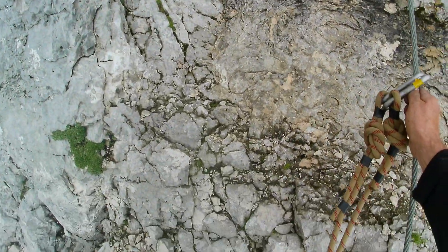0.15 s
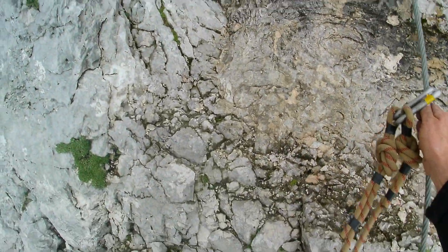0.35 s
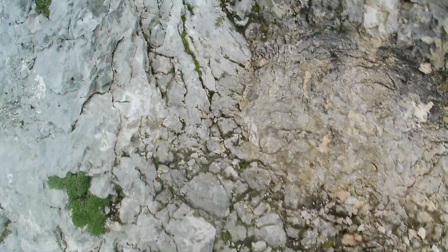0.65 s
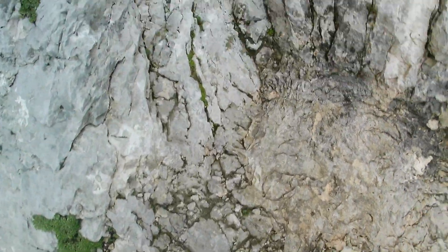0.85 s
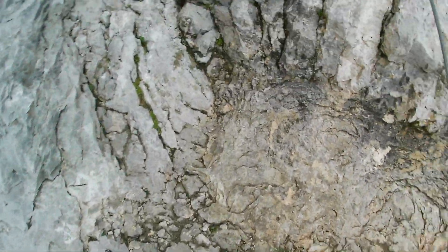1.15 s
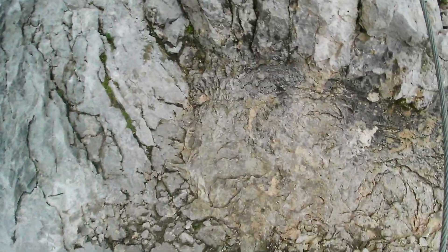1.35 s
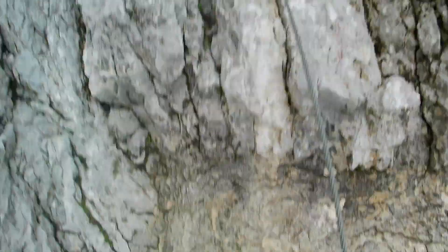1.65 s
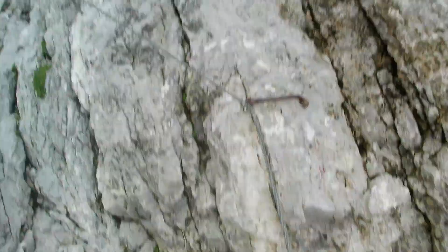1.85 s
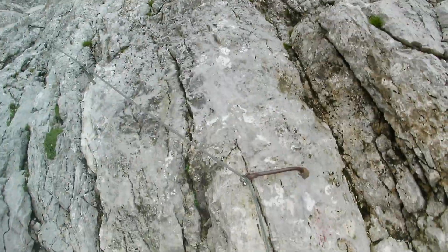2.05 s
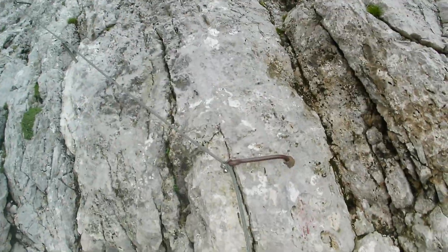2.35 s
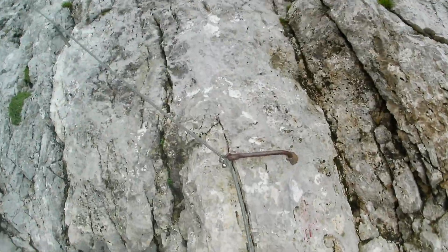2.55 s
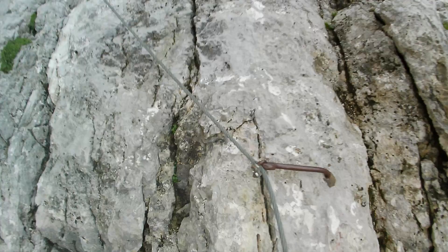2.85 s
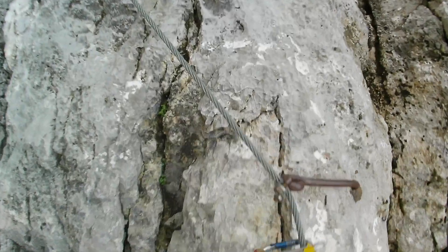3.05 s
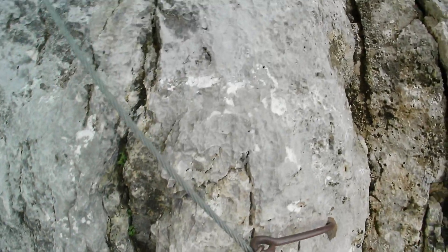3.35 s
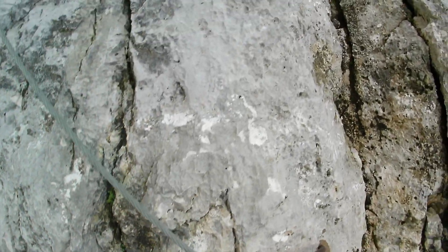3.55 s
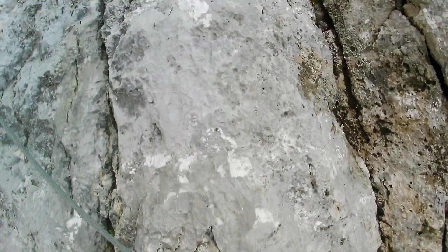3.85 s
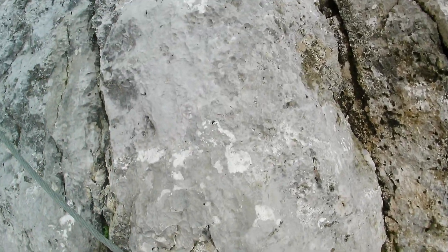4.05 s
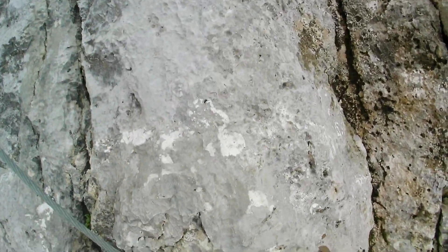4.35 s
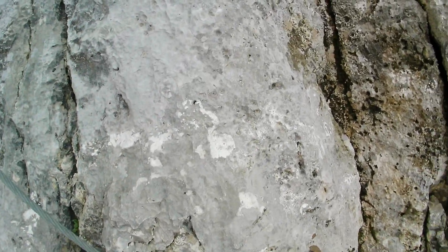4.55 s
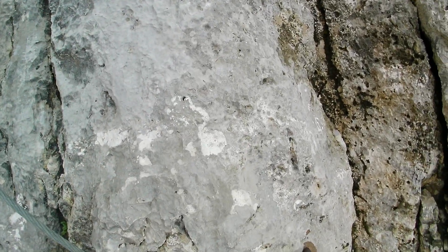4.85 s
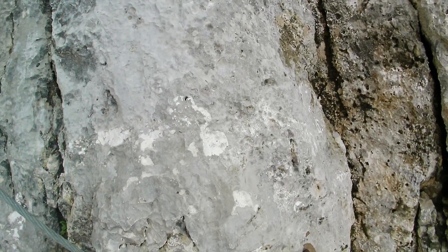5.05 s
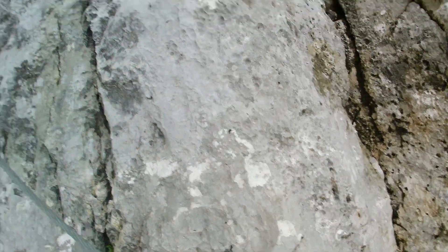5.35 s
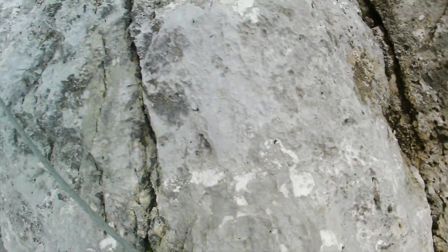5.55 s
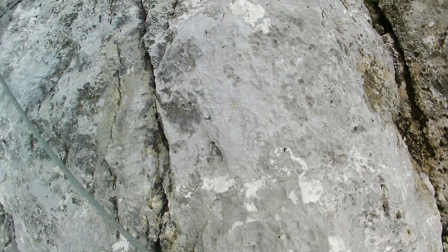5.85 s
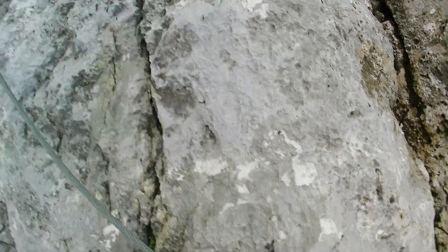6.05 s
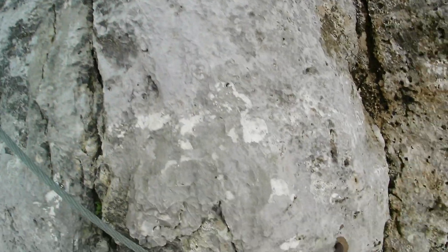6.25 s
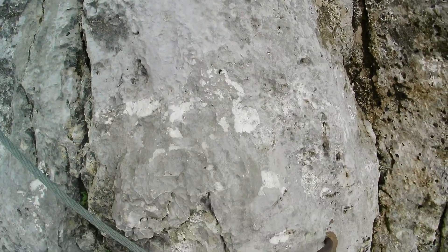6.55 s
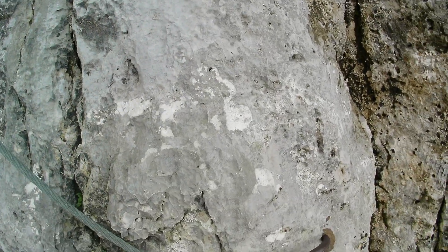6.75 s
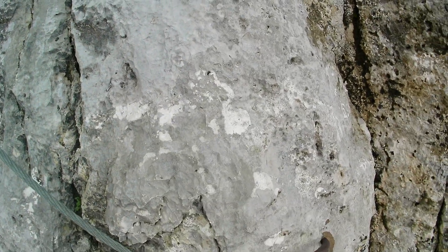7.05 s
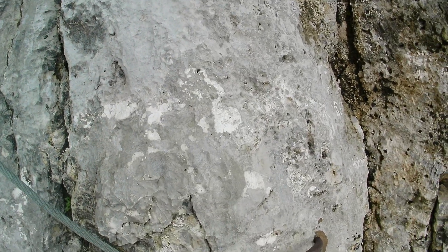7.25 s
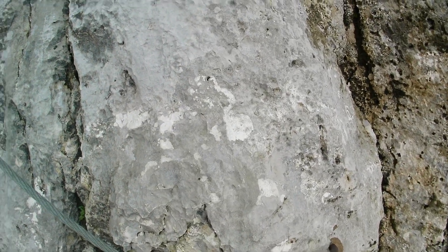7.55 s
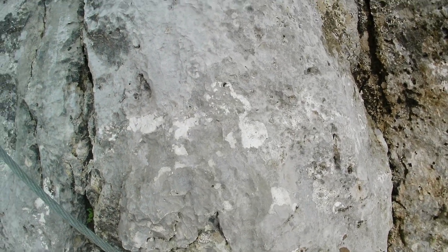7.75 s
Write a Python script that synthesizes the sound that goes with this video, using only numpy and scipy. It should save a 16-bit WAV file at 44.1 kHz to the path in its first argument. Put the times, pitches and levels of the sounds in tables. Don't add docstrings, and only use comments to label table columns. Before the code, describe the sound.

Light mountain wind runs throughout, a low lumpy buffeting with a soft rush over rock, above faint pulsing hiss and thin whine. In the first two seconds there are only tiny metal ticks, quiet scuffs near 0.8 and 1.7 s, and a dull helmet knock at 1.36 s. From 2.5 to 3.15 s a metal hook rasps along a steel cable, a rough, bright scrape catching strand by strand. Small clinks follow, with a strong, hollow knock at 3.64 s. Scattered light clinks lead to a cluster of taps around 4.8-5.35 s. At about 5.97 s a gate snaps shut, by far the loudest, dry and bright, with quick bounces. A slow ticking scrape from 6.23 s ends in a second snap at 6.5 s. Taps at 6.86, 7.28 and 7.48 s precede a four-hit chatter near 7.7 s. All metal is close and short, with little echo.

```python
import sys
import numpy as np
from scipy import signal
from scipy.fft import rfft, irfft
from scipy.io import wavfile
from scipy.ndimage import uniform_filter1d

SR = 44100
rng = np.random.default_rng(int(sys.argv[2]) if len(sys.argv) > 2 else 0)


def to_wav(s):
    ch = np.atleast_2d(s).T
    pcm = np.round(np.clip(ch, -1, 1) * 32767)
    wavfile.write(sys.argv[1], SR, pcm.astype(np.int16))


def boost_factor(decibels):
    exponent = np.asarray(decibels, float) / 20
    return 10 ** exponent


N = 349122

# (time [s], peak [dB], strongest ring [Hz], high modes [dB], rattle [ms])
SNAPS = [
    (5.951, -28, 4240, -12.5, 2.2),
    (5.956, -29.5, 2130, -15.5, 4.4),
    (5.9669, -28.5, 2000, -13, 4),
    (5.9752, -19.5, 12060, 2, 6.5),
    (5.9778, -6, 4400, -5.5, 0.58),
    (5.983, -19.5, 9900, -0.5, 1.1),
    (5.995, -37, 12000, -1.5, 3.7),
    (6.5029, -15, 7200, -5.5, 1.7),
    (6.5095, -35, 13000, -19, 0.94),
]
# (time [s], peak [dB], high modes [dB], swell of the scrape [ratio])
TICKS = [(6.269, -52, -28, 2.8), (6.3073, -49, -24, 3.6), (6.322, -46, -14, 2.9), (6.33, -56, -4, 2),
         (6.3438, -32, -17, 4.7), (6.36, -49, 7, 3.5), (6.376, -30, 0, 4), (6.398, -57, -3, 7.2),
         (6.4202, -38, -14, 6.4), (6.443, -35.5, -17, 6), (6.4636, -49, -11, 9.8), (6.4805, -33, -6, 10)]
# (time [s], peak [dB])
CHATTER = [
    (7.696, -27),
    (7.7175, -24),
    (7.7405, -26),
    (7.762, -28),
]


def rms_one(x):
    return x / np.sqrt(np.mean(x ** 2) + 1e-20)


def in_time(rows):
    s, *columns = np.transpose(rows)
    return [np.interp(np.arange(N) / SR, s, c) for c in columns]


def at_hz(points, hz):
    points = np.array(points)
    return np.interp(np.log(hz), np.log(points[:, 0]), points[:, 1])


def drift(rate, count=N):
    r = np.exp(-80 * np.pi * rate / SR)
    noise = rng.standard_normal(N // 40 + 2002)
    slow = signal.lfilter([1], [1, -2 * r, r * r], noise)[2000:]
    return np.interp(np.arange(count) / 40, np.arange(len(slow)), rms_one(slow))


def ring(clicks, hz, t60):
    r = boost_factor(-60 / (max(t60, .003) * SR))
    w = 2 * np.pi * hz / SR
    return signal.lfilter([0, np.sin(w)], [1, -2 * r * np.cos(w), r * r], clicks + 1e-18)


def banded_noise(spectrum, patchy_db, flicker):
    out, together = 0, drift(2.5)
    edges = 10 * 2 ** np.arange(0, 10.9, 1 / 3)
    white = rng.standard_normal((2, N + 8000))
    for k, (low, high) in enumerate(zip(edges, edges[1:])):
        if spectrum[0][0] < low < spectrum[-1][0]:
            sos = signal.butter(2, [low, high], "band", fs=SR, output="sos")
            band = signal.sosfilt(sos, white[k % 2])[8000:]
            level_db = at_hz(spectrum, np.sqrt(low * high))
            out = out + boost_factor(level_db + patchy_db * (0.39 * together + drift(flicker))) * band
    return rms_one(out)


def rattle(chance, rattle_ms):
    ms = np.arange(len(chance)) / SR * 1000
    fast = np.exp(-ms / max(rattle_ms, .2))
    contacts = 0.098 * np.clip(chance, -2.6, 2.6) ** 3 * fast
    contacts += 0.089 * chance * np.exp(-ms / 11)
    contacts[0] = 2.84 / max(rattle_ms, .2)
    return contacts


def add(out, s, sound, peak_db):
    i = round(s * SR)
    out[i:i + len(sound)] += (boost_factor(peak_db) * sound / np.abs(sound).max())[:N - i]


def colour_db(hz, low_db, high_db):
    low_share = np.clip((3200 - hz) / 500, 0, 1)
    high_share = np.clip((hz - 6000) / 1200, 0, 1)
    return low_db * low_share + high_db * high_share


def camera():
    # (frequency [Hz], level [dB per Hz])
    hiss_spectrum = [(2060, -52.5), (3500, -1), (10900, -6), (11800, -7), (12800, -29.5), (15100, 2.5),
                     (16000, 8)]
    hiss_db, whine_db, whine_hz = -73, -84.5, 11640
    pulses_per_s, first_pulse_s = 16, .012
    cycle = (np.arange(N) / SR - first_pulse_s) * pulses_per_s
    pulse = np.exp(2.5 * (np.cos(2 * np.pi * cycle) - 1)) * boost_factor(2.5 * drift(8))
    whine = rms_one(ring(rng.standard_normal(N), whine_hz, 0.055) * pulse)
    hiss = banded_noise(hiss_spectrum, patchy_db=1.2, flicker=20) * (1 + 0.3 * pulse)
    return boost_factor(hiss_db) * hiss + boost_factor(whine_db) * whine


def wind():
    # (time [s], gust [dB])
    gusts = [(0.0, -67), (1.45, -64), (2.53, -66.5), (2.8, -82), (3.11, -65), (4.52, -64.5), (5.9, -66.5),
             (6.55, -63.5), (7.1, -67.5), (7.43, -62.5), (7.92, -61)]
    # (frequency [Hz], level [dB per Hz])
    buffet_spectrum = [(4.7, -30), (8.0, -8.5), (16, -13), (19, -15), (32, -14), (101, -23), (220, -43.5),
                       (290, -48.5), (480, -120)]
    # (frequency [Hz], level [dB per Hz])
    rush_spectrum = [(88, -56), (150, 4.5), (215, -6), (300, 3.5), (344, -5.5), (400, -1.5), (775, -8.5),
                     (943, -4.5), (1180, -14), (1480, -11), (1890, -12), (2190, -11), (2920, -24),
                     (5500, -29), (7150, -62), (12100, -120)]
    rush_db, = in_time(gusts)
    buffet_db = -55.5 + 0.13 * (rush_db - rush_db.mean())
    buffet = boost_factor(buffet_db) * banded_noise(buffet_spectrum, patchy_db=0.0, flicker=46)
    return buffet + boost_factor(rush_db + 4.0) * banded_noise(rush_spectrum, patchy_db=1.8, flicker=10)


def helmet_knocks():
    # (time [s], peak [dB], body [Hz], thump [dB], bright edge [dB])
    knock_rows = [(0.889, -44, 700, 8, -4), (0.898, -37.5, 455, -35, -36), (1.3583, -24.5, 590, 6, -43),
                  (1.364, -34, 130, 9, -43), (1.838, -45, 875, -16, -18), (1.909, -50, 393, -20, -25),
                  (1.949, -51.5, 476, -28, -34), (2.482, -35, 103, -27, -35), (2.506, -42, 920, -20, -10),
                  (2.712, -33.5, 456, -44, -16), (3.6417, -15.5, 520, -8, -10), (3.645, -35, 89, -30, -40),
                  (3.654, -28.5, 200, -2, -26), (4.046, -38.5, 110, -12.5, -16.5),
                  (7.907, -39.5, 456, -48, -8), (3.6435, -35.5, 1500, -40, -35)]
    # (time [s], peak [dB], body [Hz], thump [dB], rattle [ms])
    scuff_rows = [
        (0.802, -40.5, 950, -42, 50),
        (0.827, -44.5, 700, 2, 23),
        (1.554, -42, 1360, -4, 21),
        (1.564, -41.5, 636, -13, 14),
        (1.702, -43.5, 1540, -11, 18),
        (1.7203, -30.5, 714, -1.5, 6.6),
    ]
    blows = [(*row, 2.4 * boost_factor(0.25 * (row[1] + 51.0))) for row in knock_rows]
    blows += [(s, db, hz, thump_db, -18, ms) for s, db, hz, thump_db, ms in scuff_rows]
    blows += [(s, db - 18.5, 606, -30.0, -30.0, 3.0) for s, db in CHATTER]
    out, chance = np.zeros(N), rng.standard_normal((len(blows), 3000))
    soft = signal.butter(3, 2800, fs=SR, output="sos")
    for (s, peak_db, hz, thump_db, edge_db, ms), noise in zip(blows, chance):
        contacts = signal.sosfilt(soft, rattle(noise, ms))
        sound = ring(contacts, hz, min(6.2 / hz, .03)) + boost_factor(-27.0) * ring(contacts, 987, 0.072)
        sound += boost_factor(thump_db) * (ring(contacts, 315, 0.025) + boost_factor(-1.0) * ring(contacts, 94, 0.016))
        sound += boost_factor(edge_db + 2.0) * ring(contacts, 2220, 0.0072)
        add(out, s, sound, peak_db)
    return out


def slide(rows, peaks, swells, swell_s, wavering):
    # (frequency [Hz], level [dB per Hz])
    grit_spectrum = [(240, -45), (400, -6), (839, 5), (2840, -27), (3750, 5.5), (4900, -7), (6500, -11),
                     (7870, -3), (10500, -11.5), (13300, 3), (16000, -42)]
    strands_per_s, grains_per_s, squeal_hz, swell_rise_s = 160, 12000, 5700, 0.00043
    first, last = round(rows[0][0] * SR), round(rows[-1][0] * SR)
    count = last - first
    level_db, speed_db, pressure_db = (c[first:last] for c in in_time(rows))
    low_db = -3.5 + pressure_db
    high_db = -4.5 + 0.41 * speed_db
    squeal_db = -5.5 + 0.54 * speed_db

    strands = np.cumsum(strands_per_s * boost_factor(1.3 * drift(11, count))) / SR % 1
    bumps = 1 + 0.44 * np.exp(-strands / 0.44) * boost_factor(2.1 * drift(23, count))
    for s, swell in swells:
        since = np.maximum(np.arange(first, last) / SR - s, 0)
        bumps = bumps + swell * (1 - np.exp(-since / swell_rise_s)) * np.exp(-since / swell_s)
    grains = (rng.random(count) < grains_per_s / SR) * rng.standard_normal(count) * bumps

    sound, steps = np.zeros(count), np.arange(count)
    for k, (hz, width, db) in enumerate(peaks):
        squeal = (squeal_db + 18.5) * (abs(hz - squeal_hz) < 350)
        gain = boost_factor(db + colour_db(hz, low_db, high_db + 6.0) + squeal + 1.2 * drift(14.0, count))
        waver = np.cumsum(wavering * drift(7.4, count))
        tone = np.interp(steps + waver - waver.mean(), steps, ring(grains, hz, 1.61 / width))
        sound += (-1) ** k * gain * width / SR * tone
    hz = np.fft.rfftfreq(count, 1 / SR) + 1
    grit = irfft(rfft(grains) * boost_factor(at_hz(grit_spectrum, hz)), count)
    sound += boost_factor(-22 + 0.71 * high_db) * grit
    fade = signal.windows.tukey(count, .08)
    return np.pad(boost_factor(level_db + 26.5) * sound * fade, (first, N - last))


def slow_nudge():
    # (time [s], scrape [dB], speed [dB], pressure [dB])
    course = [
        (6.23, -76, -8.5, 0),
        (6.28, -57, -11, -1),
        (6.32, -55.5, -9, 0.77),
        (6.36, -55.5, 5, -1.7),
        (6.41, -57, -13, 0.22),
        (6.455, -58, -11, 0.46),
        (6.488, -54, -13, 0.29),
        (6.5, -61, 12, 0),
    ]
    # (frequency [Hz], width [Hz], level [dB])
    peaks = [(1876, 44, 21), (2220, 96, 13.5), (2707, 22, 15), (920, 150, 4.5), (1250, 340, 0),
             (12800, 630, 1), (3190, 83, 7.5), (3980, 200, 4.5), (5680, 27, 3.5), (7100, 49, -14),
             (7900, 260, -0.5), (9900, 120, -33), (10600, 35, -13), (11700, 35, 3), (13600, 100, -6),
             (14100, 47, -18), (15200, 52, -19.5)]
    swells = [(row[0], row[-1]) for row in TICKS]
    return slide(course, peaks, swells, swell_s=0.0054, wavering=.002)


def long_slide():
    # (time [s], scrape [dB], speed [dB], pressure [dB])
    course = [(2.5, -55, -20, 12), (2.545, -44, -14, -2.5), (2.62, -38, -16, 1), (2.68, -42.5, -15, 3),
              (2.74, -44, 11.5, -3), (2.84, -44, -2.5, 5.5), (2.9, -42.5, -3, -1), (2.98, -40, -9.5, 1),
              (3.075, -45.5, -18, 6), (3.095, -57.5, 9, 10), (3.17, -75, 30, -2)]
    # (frequency [Hz], width [Hz], level [dB])
    peaks = [(887, 66, 2), (1398, 21, 4.5), (1897, 120, 4), (2244, 17, 9.5), (2535, 58, 4),
             (3670, 370, 5.5), (5750, 440, -10), (5980, 6.7, -5), (6240, 28, -15), (7140, 30, -15),
             (7750, 740, -1.5), (8720, 260, -3), (10300, 77, -8), (11000, 72, -4), (13000, 1300, -10),
             (15100, 50, -26)]
    # (time [s], peak [dB])
    catches = [(2.5202, -47), (2.541, -29), (2.565, -26), (2.5814, -27), (2.5984, -39), (2.6174, -26),
               (2.6354, -26), (2.6524, -31), (2.668, -35), (2.697, -28), (2.7045, -25), (2.7232, -28),
               (2.73, -30), (2.7474, -34), (2.7564, -41), (2.7754, -34), (2.7856, -33), (2.7934, -25),
               (2.8094, -27), (2.8344, -29), (2.87, -32), (2.8788, -27), (2.89, -21), (2.902, -30),
               (2.953, -34), (2.966, -29), (2.983, -27), (2.9934, -32), (3.01, -29), (3.0435, -38),
               (3.0744, -32)]
    swells = [(s, boost_factor(db + 29)) for s, db in catches]
    return slide(course, peaks, swells, swell_s=0.0034, wavering=.005)


def all_touches():
    # (time [s], peak [dB], strongest ring [Hz], high modes [dB])
    swings = [(.6164, -50.5, 6900, -9), (.6415, -42.5, 5420, -9.5), (.6654, -52, 3820, 1),
              (.6904, -51, 3670, -4), (1.264, -50.5, 4100, -5), (2.4399, -50.5, 3750, 0.5),
              (2.5194, -55, 3850, -17), (3.105, -37, 5800, -26), (3.123, -42, 5800, -22),
              (3.134, -41, 5800, -24), (3.228, -54, 2995, 9), (3.244, -35, 3880, -3.5),
              (3.3208, -43.5, 4400, -6.5), (3.5324, -37, 4340, 0), (3.5345, -39, 5700, -26),
              (3.629, -47.5, 5850, -15), (3.7817, -47.5, 6100, -9.5), (3.8057, -42.5, 3260, -11),
              (3.8776, -39.5, 3360, -18), (3.9868, -45.5, 5800, -10.5), (4.19, -41, 3900, -11),
              (4.2236, -53, 3720, -19), (4.856, -65, 13400, 0), (4.9896, -42.5, 3730, -40),
              (5.019, -38, 4460, -6), (5.028, -43, 7560, -1), (5.0457, -40.5, 3570, -15),
              (5.0814, -38.5, 4330, -40)]
    # (time [s], peak [dB], strongest ring [Hz], high modes [dB])
    taps = [(.165, -46, 3800, -6.5), (1.0176, -44.5, 3420, -28), (4.893, -42.5, 7070, -21),
            (4.9094, -51, 3300, -29), (5.0125, -46, 2300, -20), (5.2116, -44, 3650, -37),
            (5.252, -41, 3270, -41), (5.2622, -42, 3570, -37), (5.3127, -33.5, 4650, -47),
            (5.3482, -30, 4900, -14), (6.8568, -29, 7540, -10), (7.2565, -40.5, 3660, -25),
            (7.2795, -26.5, 2300, -11.5), (7.3947, -41, 3580, -38.5), (7.4772, -30, 3460, -15),
            (7.5085, -45, 3830, -6), (7.8126, -42.5, 3650, -14), (7.9035, -39.5, 3830, -21)]
    # (time [s], peak [dB], strongest ring [Hz], high modes [dB], low modes [dB])
    grazes = [(.2023, -43, 3670, -11.5, 3), (.215, -56, 4430, -5, 1), (.7098, -45.5, 7480, -10.5, 4),
              (2.4843, -48, 4000, -11, 2), (4.8025, -42.5, 3940, -12, 14), (7.27, -42.5, 3850, -19, -13.5),
              (5.016, -43.5, 2295, -14, 15), (5.268, -43.5, 2310, -34, 17), (6.185, -48.5, 2220, -20, 20),
              (7.2645, -39, 3540, -32, 2), (7.457, -46.5, 3480, -31, 1), (7.634, -43, 2300, -12, 17),
              (7.668, -40.5, 2310, -18, 9)]
    duller_db = 0.53
    rows = []
    for table, low_db, ms in [(swings, -14, 2.66), (taps, 0.5, 1.11)]:
        for s, db, hz, high_db in table:
            rows.append((s, db, hz, low_db, high_db, ms * boost_factor(duller_db * (high_db + 22.5))))
    for s, db, hz, high_db, low_db in grazes:
        rows.append((s, db, hz, low_db, high_db, 11.8 * boost_factor(duller_db * (high_db + 18))))
    rows += [(s, db, hz, -0.5, high_db, ms) for s, db, hz, high_db, ms in SNAPS]
    rows += [(s, db, 1860, 7, high_db, 1.7) for s, db, high_db, swell in TICKS]
    rows += [(s, db, 3760, 0, -12.5, 1.04) for s, db in CHATTER]
    return rows


def clinks():
    # (frequency [Hz], level [dB], t60 [s])
    hook_modes = [(520, -27.5, 0.025), (850, -17, 0.022), (1080, -13, 0.052), (1900, -34, 0.036),
                  (2390, -6.5, 0.085), (2860, -5.5, 0.058), (3540, 1, 0.018), (4030, -16, 0.013),
                  (4000, -2.5, 0.048), (4400, 2.5, 0.021), (4750, -1.5, 0.039), (5310, -1.5, 0.029),
                  (5800, -5.5, 0.075), (6150, -2.5, 0.0097), (7230, -14.5, 0.015), (7140, -7.5, 0.0083),
                  (7400, 3, 0.025), (8260, 5.5, 0.01), (8640, 1.5, 0.0077), (9680, 0, 0.038),
                  (10640, -7, 0.032), (11590, -7.5, 0.02), (12160, 12.5, 0.0057), (13400, -12.5, 0.012),
                  (13900, -2.5, 0.018)]
    crack_db, ping_db, ping_t60_s = 18.5, 9.5, 0.012
    cable_hz, cable_db, cable_t60_s = 2295, -7, 0.094
    spring_hz, spring_db, spring_t60_s = 2012, -14.5, 0.014
    touches = all_touches()
    out, chance = np.zeros(N), rng.standard_normal((len(touches), 3000))
    luck = rng.standard_normal((len(touches), len(hook_modes)))
    contacts, sounds = np.zeros_like(chance), np.zeros_like(chance)
    for k, (s, peak_db, hz, low_db, high_db, ms) in enumerate(touches):
        top_hz = np.clip(24000 * boost_factor(0.53 * high_db), max(4800, hz), 14500)
        contacts[k] = signal.lfilter(*signal.butter(2, top_hz, fs=SR), rattle(chance[k], ms))
        crack = boost_factor(crack_db) * np.diff(contacts[k], prepend=0)
        ping = boost_factor(ping_db - 0.7 * min(low_db, 0)) * ring(contacts[k], hz, ping_t60_s)
        sounds[k] = crack + ping

    low_db, high_db = np.array(touches)[:, 3:5].T
    for (hz, db, t60), strengths in zip(hook_modes, luck.T):
        colour = colour_db(hz, low_db + 0.5, 1.71 * high_db + 13.5)
        gain = boost_factor(db + colour + 0.51 * strengths)[:, None]
        sounds += gain * (ring(contacts, hz, 0.24 * t60) + boost_factor(-1.5) * ring(contacts, hz, 0.22 * t60))
    sounds += boost_factor(cable_db + low_db)[:, None] * ring(contacts, cable_hz, cable_t60_s)

    thin = signal.butter(4, 1560, "high", fs=SR, output="sos")
    snap_times = [row[0] for row in SNAPS]
    for touch, sound, contact in zip(touches, sounds, contacts):
        if touch[0] in snap_times:
            sound = signal.sosfilt(thin, sound / np.abs(sound).max())
            spring = ring(contact, spring_hz, spring_t60_s)
            sound = sound + boost_factor(spring_db) * spring / np.abs(spring).max()
        add(out, touch[0], sound, touch[1])
    return signal.sosfilt(signal.butter(3, 450, "high", fs=SR, output="sos"), out)


def scene():
    background = camera() + wind()
    metal = slow_nudge() + long_slide() + clinks()
    delayed = np.pad(metal, (round(.0045 * SR), 0))[:N]
    echo = signal.lfilter([.5], [1, -.5], delayed)
    return (background + helmet_knocks() + metal + boost_factor(-13.5) * echo)[None]


def thin_treble(x):
    frames = dict(window="cosine", nperseg=2048, noverlap=1024, fs=SR)
    hz, s, lines = signal.stft(x, **frames)
    size, hz = np.abs(lines), hz[:, None]
    level_db = 20 * np.log10(size[hz[:, 0] > 3000].mean(axis=0) + 1e-12)
    refill_db = 45 * s
    hunger_db = np.maximum.accumulate(level_db + refill_db) - refill_db - level_db
    loud = np.clip((level_db - np.median(level_db) - 4) / 8, 0, 1)
    steady = level_db - np.minimum(np.roll(level_db, 1), np.roll(level_db, 2)) < 5
    quiet = 1.35 * np.clip((hz - 1500) / 4000, 0, 1)
    busy = (0.75 + 0.75 * np.clip((hz - 8500) / 1500, 0, 1)) * (hz > 650)
    after = 0.024 * np.clip(hunger_db, 0, 15) * np.clip((hz - 650) / 1500, 0, 1)
    bar = steady * ((1 - loud) * quiet + loud * busy + after)
    kept = size > bar * uniform_filter1d(size, size=40, axis=0)
    return signal.istft(lines * kept, **frames)[1][:N]


def band_limit(x):
    return signal.sosfilt(signal.butter(12, 16510, fs=SR, output="sos"), x)


def record(dry):
    top_cut = signal.cheby2(10, 40, 16200, fs=SR, output="sos")
    cut = signal.sosfilt(top_cut, dry[0])
    mix = thin_treble(cut)[None] + .0149
    return band_limit(mix)


dry = scene()
out = record(dry)
to_wav(out)
```